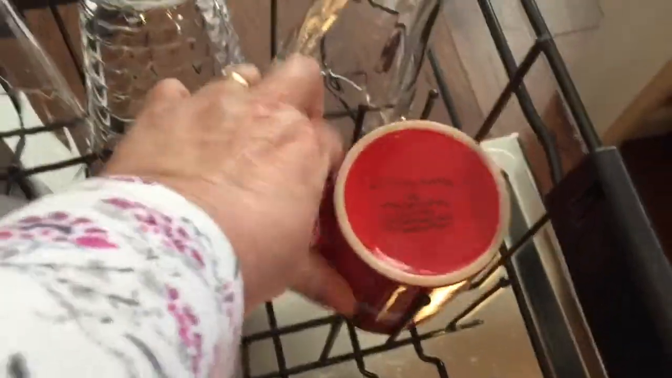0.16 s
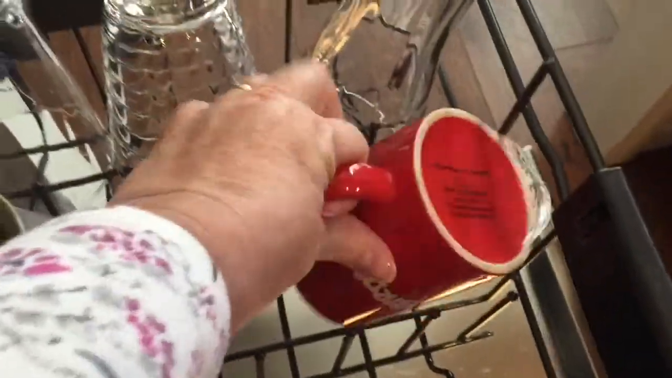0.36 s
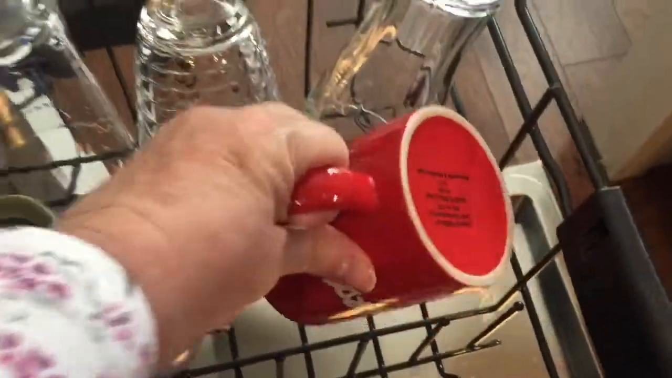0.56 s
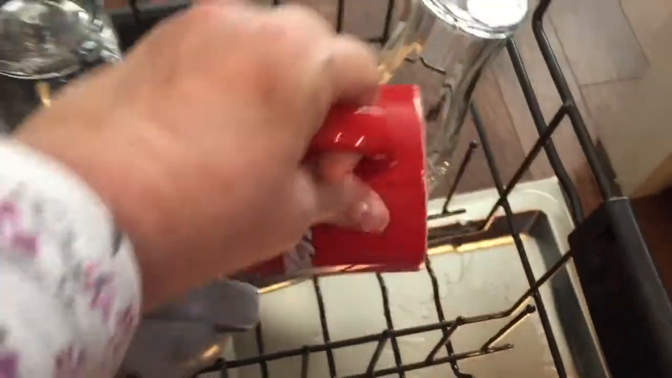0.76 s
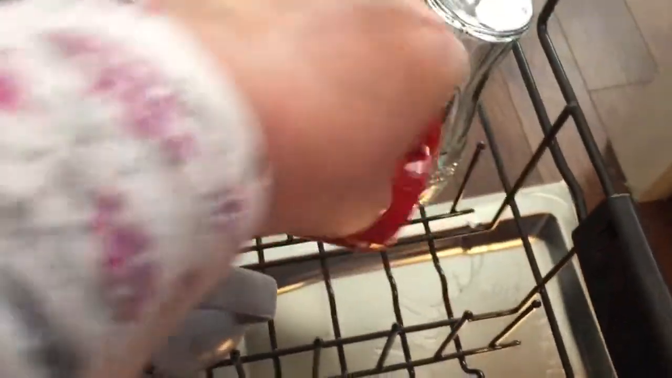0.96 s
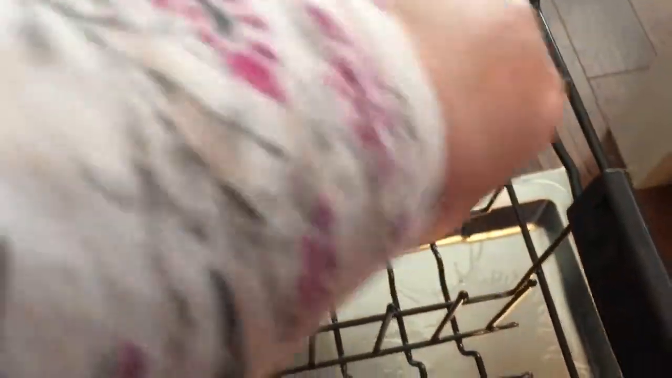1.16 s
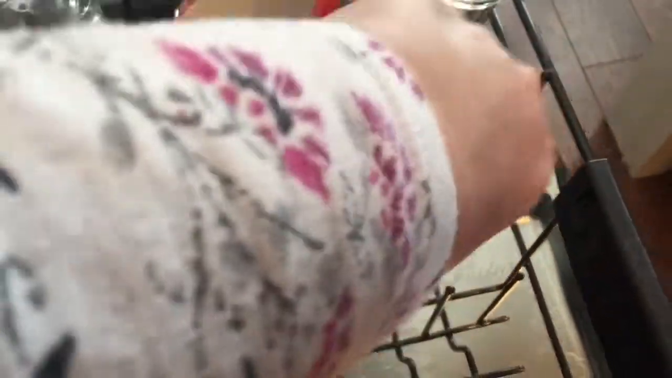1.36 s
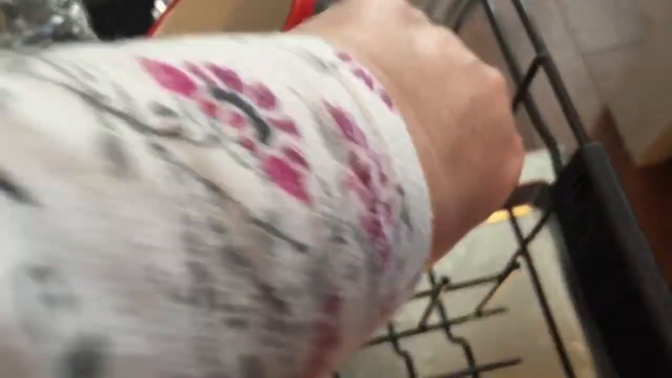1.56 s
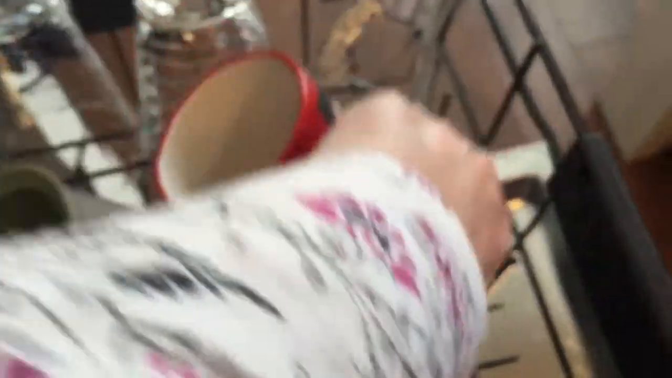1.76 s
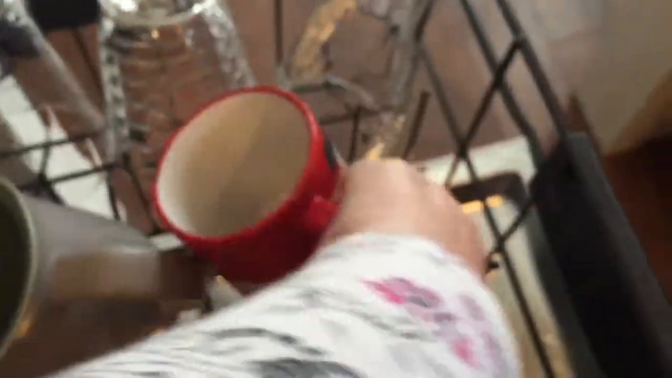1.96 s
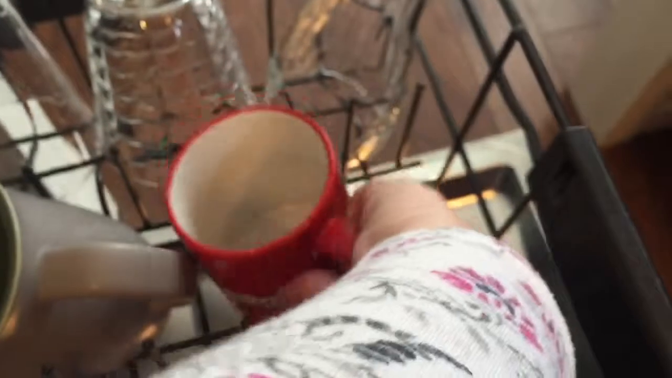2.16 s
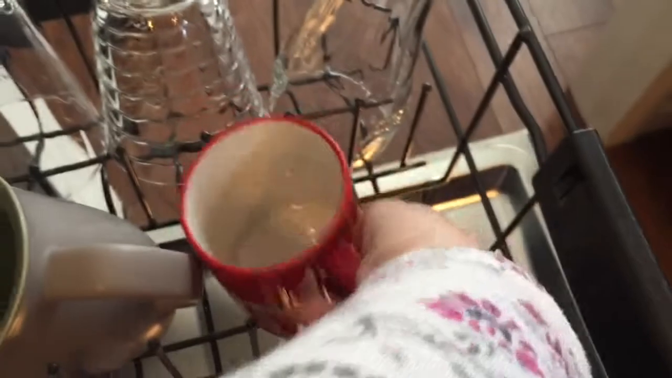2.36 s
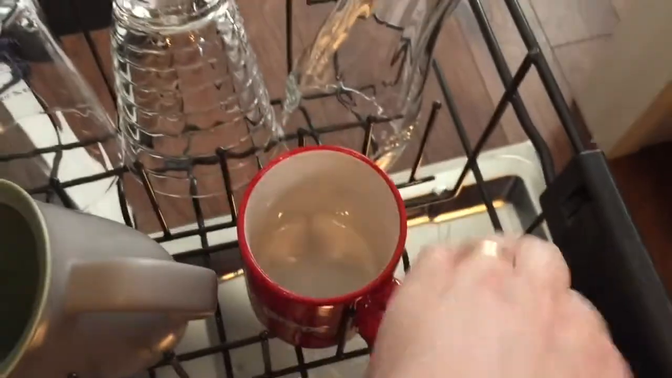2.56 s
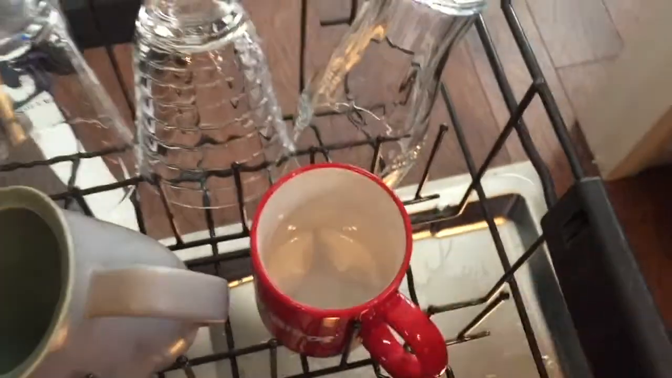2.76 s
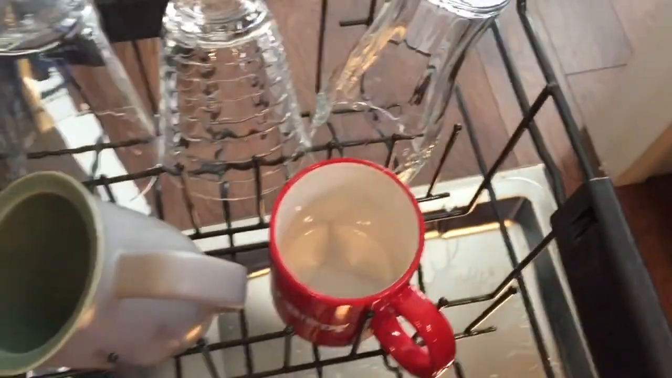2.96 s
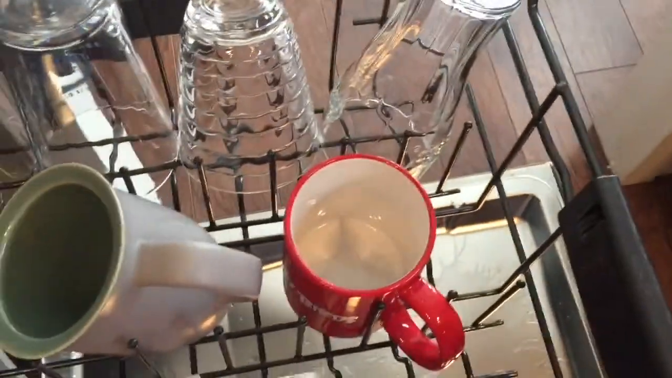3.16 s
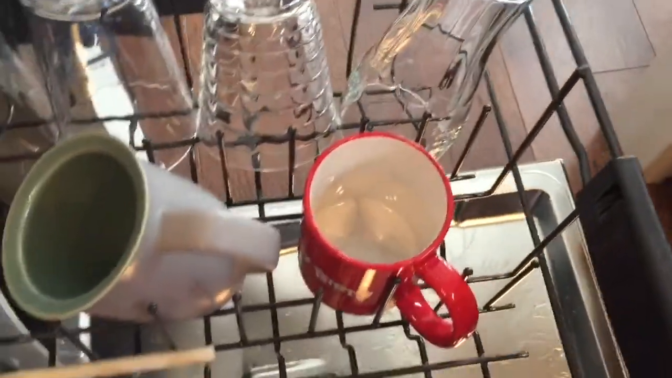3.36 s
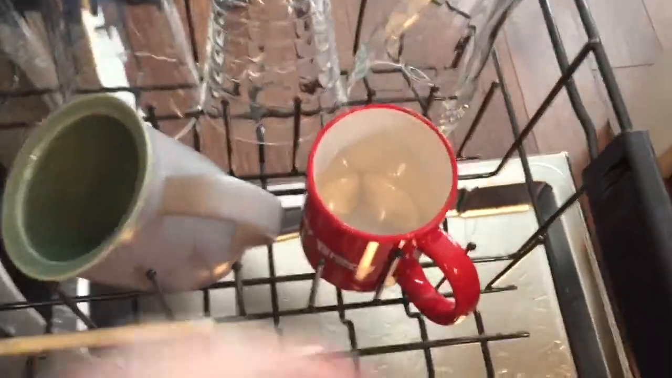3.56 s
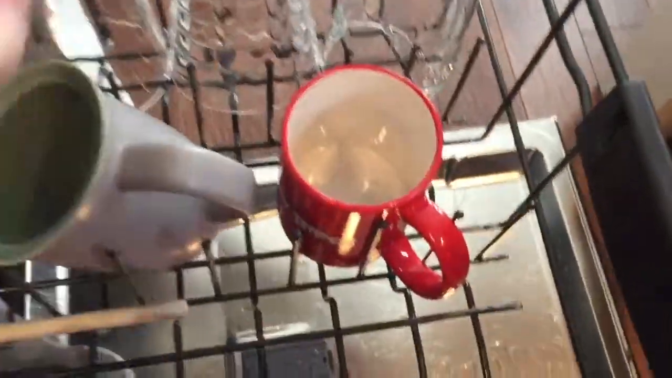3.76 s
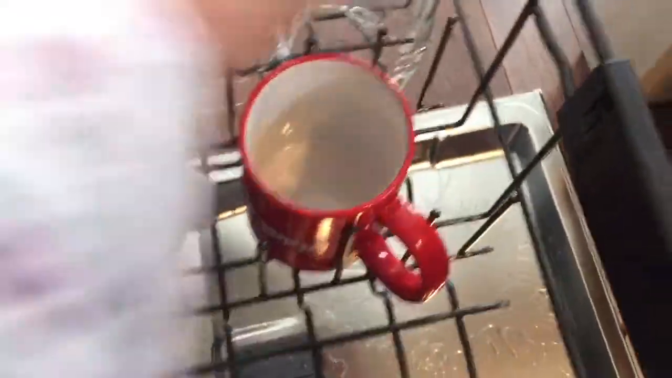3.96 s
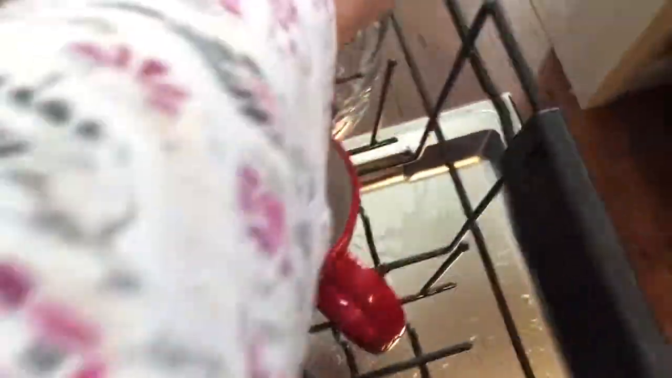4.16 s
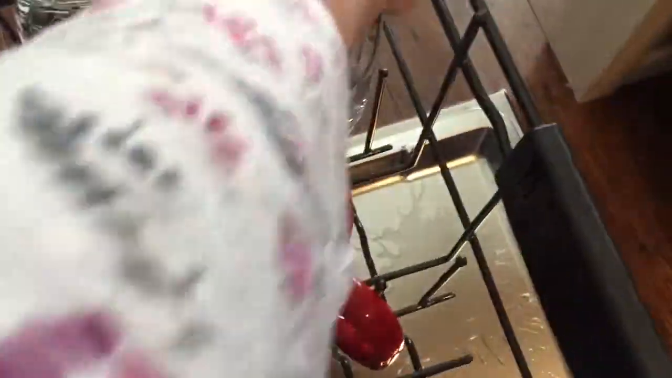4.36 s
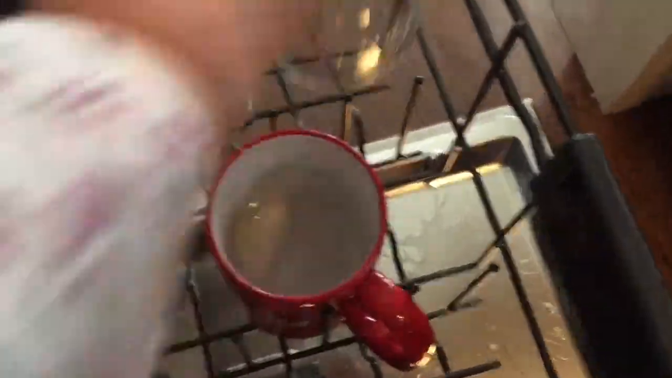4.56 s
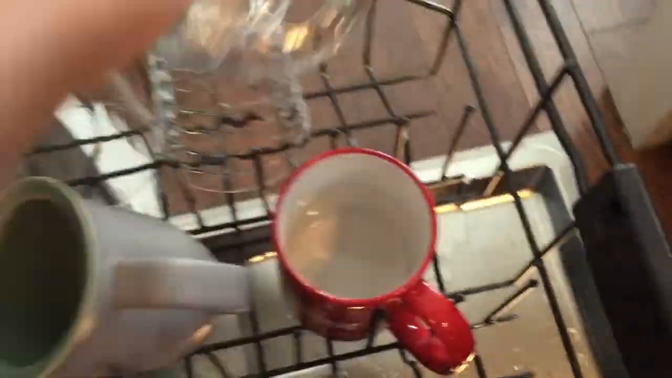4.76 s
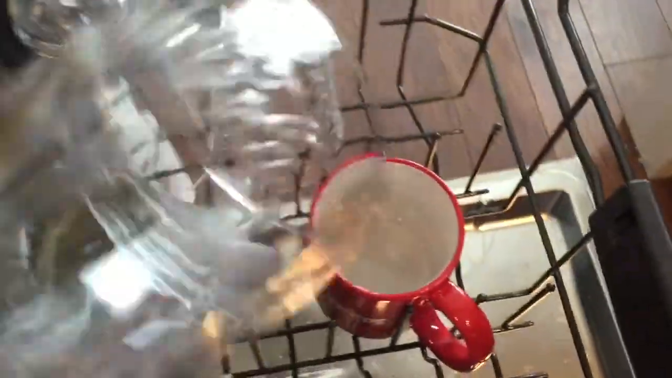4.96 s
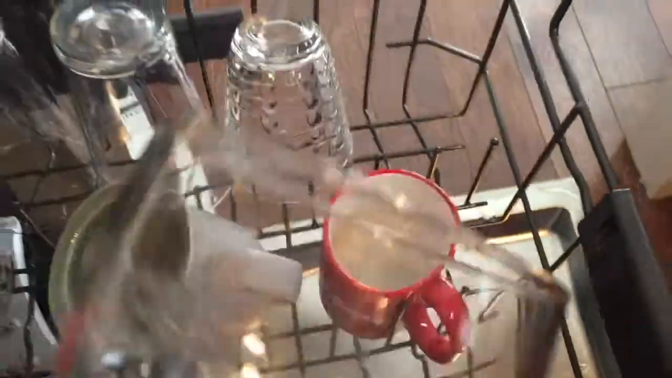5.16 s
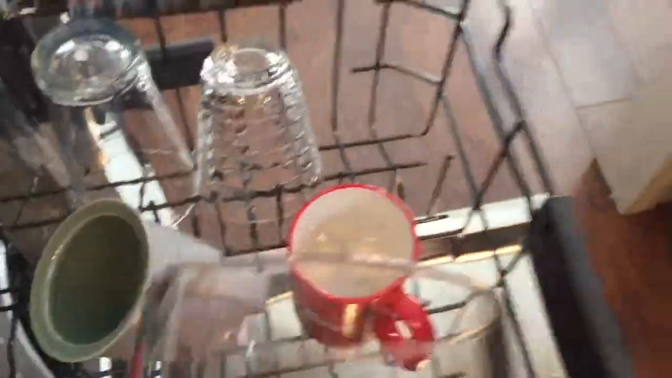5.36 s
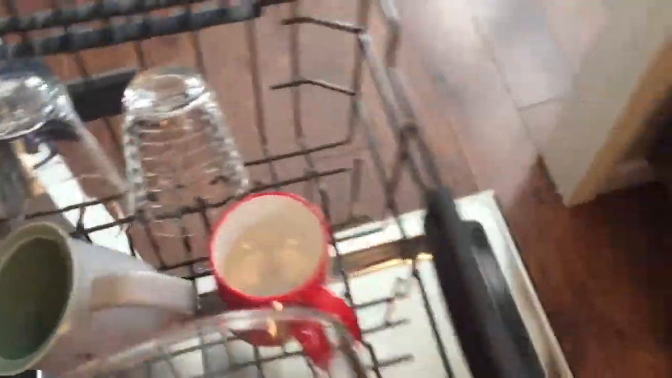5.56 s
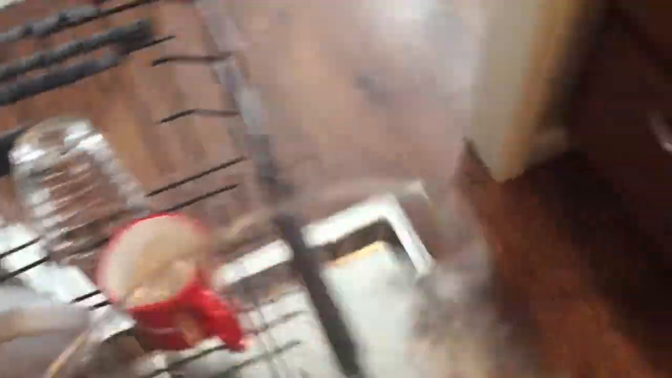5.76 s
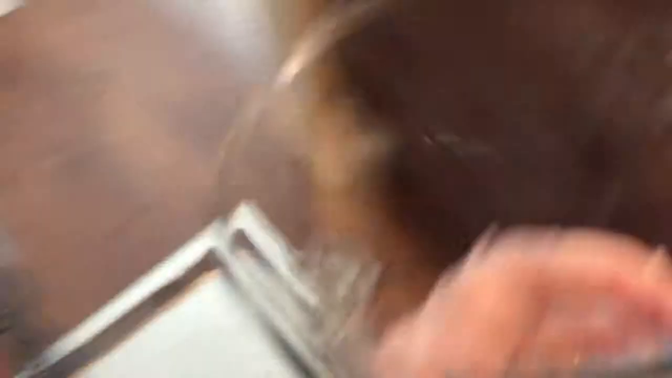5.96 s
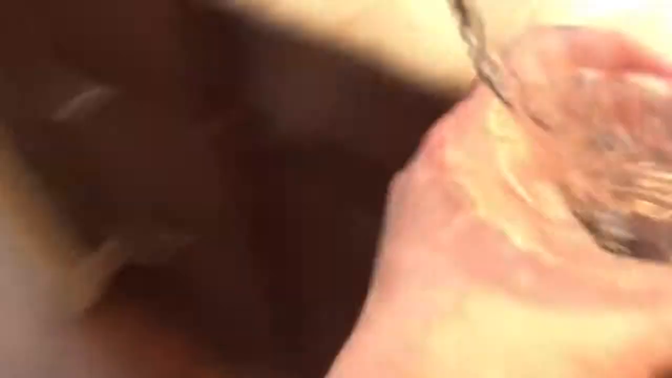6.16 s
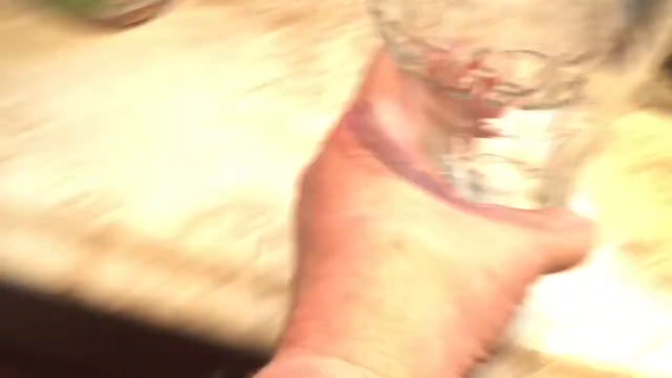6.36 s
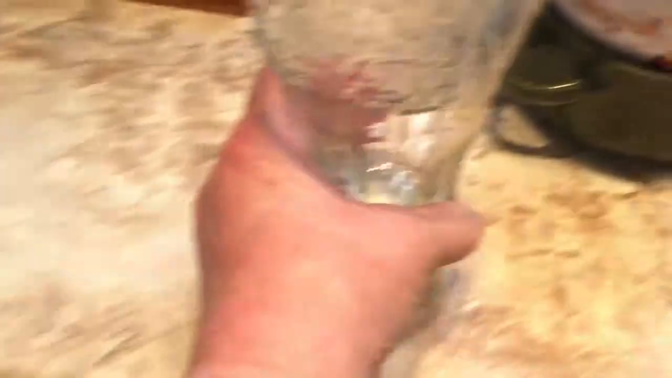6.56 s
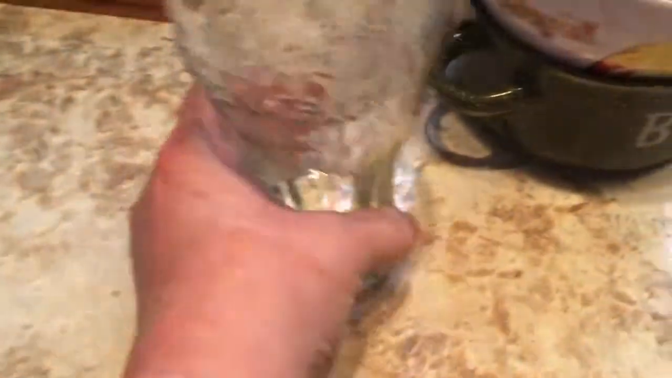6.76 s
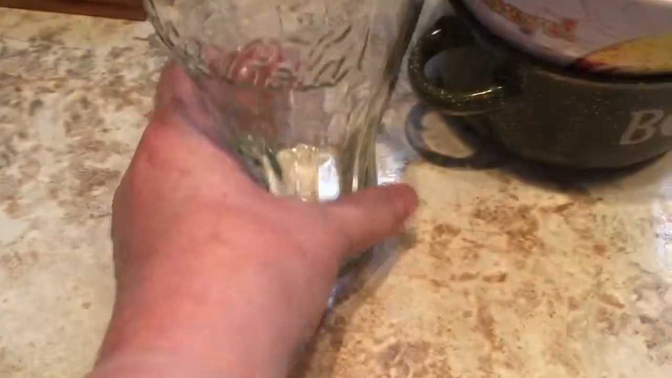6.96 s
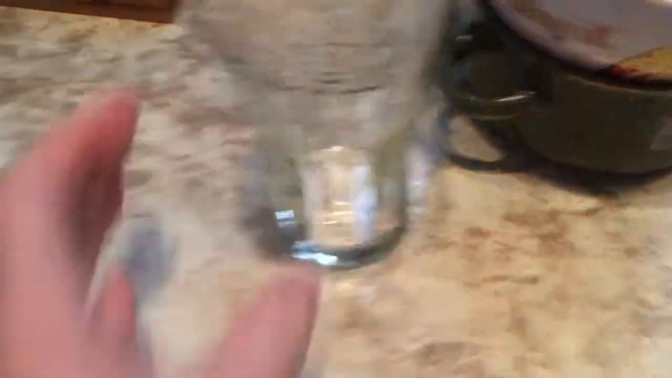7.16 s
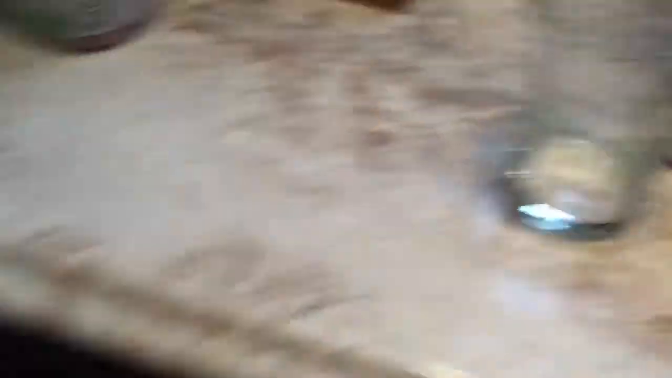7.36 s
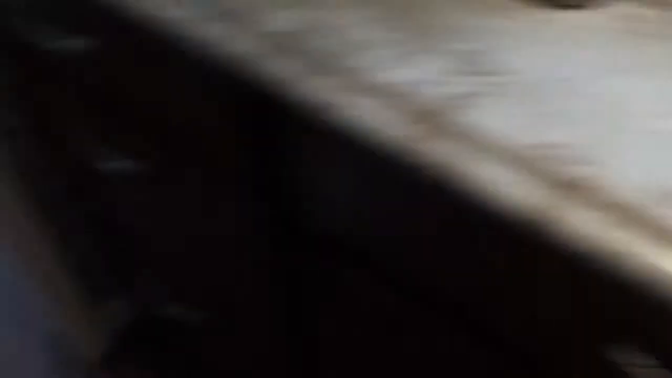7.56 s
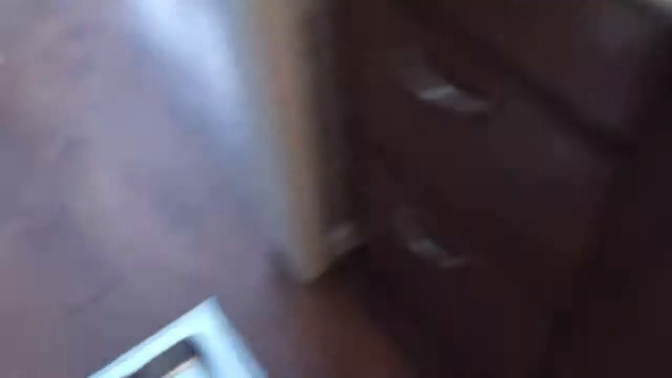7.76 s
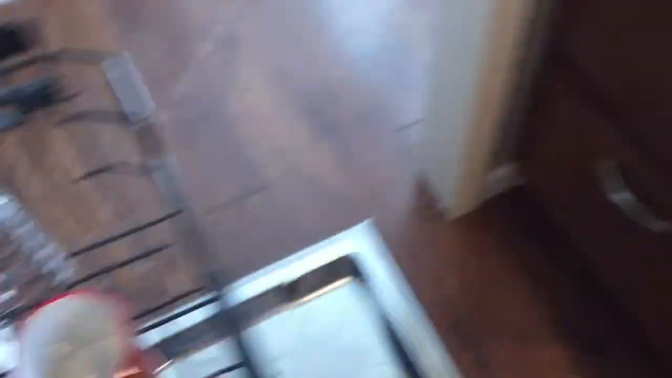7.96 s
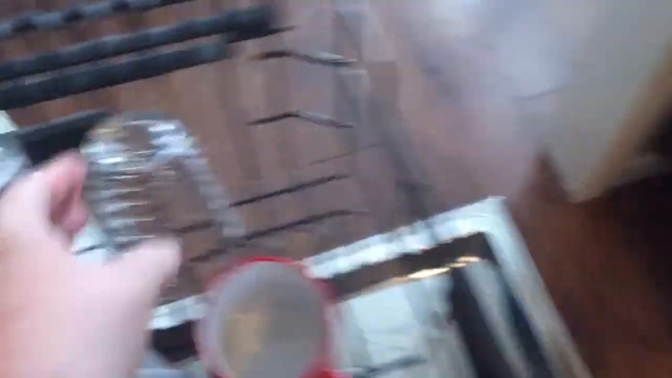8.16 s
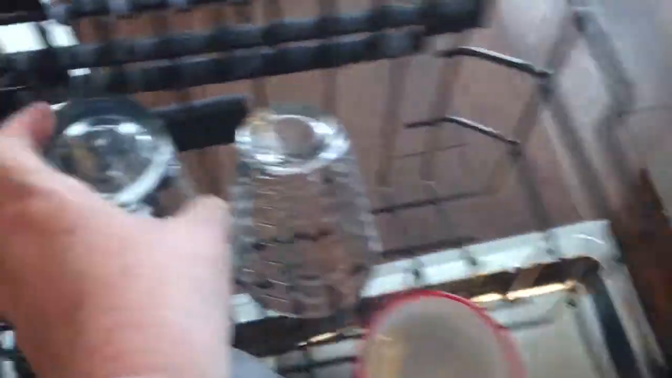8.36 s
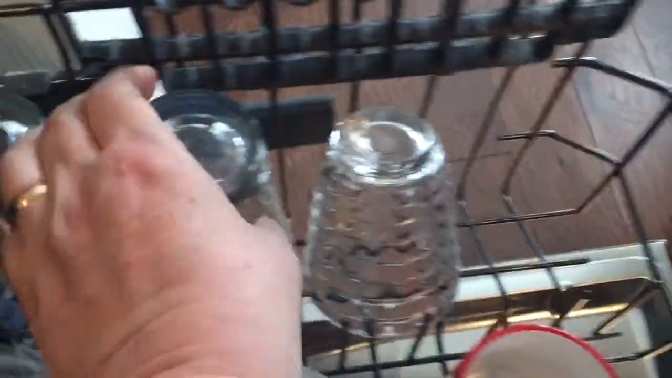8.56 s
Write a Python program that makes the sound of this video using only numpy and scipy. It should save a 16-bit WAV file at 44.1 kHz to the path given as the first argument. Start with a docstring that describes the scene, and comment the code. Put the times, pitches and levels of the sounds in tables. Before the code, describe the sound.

In a small kitchen, heard close up, a ceramic mug is turned over in a wire dishwasher rack. The wires rattle and the mug clinks sharply against its neighbours, then clatters again as it settles. After a pause a drinking glass grazes another and rings faintly as it is lifted out. Low handling thumps follow, and the glass lands on a stone counter with a firm knock. A faint appliance hum lies underneath.

```python
"""Mug and glass at an open dishwasher

A small hard kitchen, heard close up on a hand-held phone. A hand turns a mug over in the wire rack:
it clinks on its neighbours and the rack jolts and rattles. A tall glass is lifted out, sings until
fingers stop it, and is set on a stone counter. The room rings briefly over a low appliance hum."""
import sys
import numpy as np
from scipy import signal
from scipy.fft import rfft, irfft
from scipy.io import wavfile
from scipy.ndimage import uniform_filter1d

SR = 44100
rng = np.random.default_rng(int(sys.argv[2]) if len(sys.argv) > 2 else 0)


def put_to_file(sound):
    """Save the sound as 16-bit audio at rate SR, in the file named by the first command-line argument."""
    columns = np.atleast_2d(sound).T  # one column per channel
    safe = np.clip(columns, -1, 1)
    whole_steps = np.round(safe * 32767)
    wavfile.write(sys.argv[1], SR, whole_steps.astype(np.int16))


N = 383213

# modes of two mugs in the rack: f/Hz; and for each mode level/dB, t60/s
MUG_A_HZ, MUG_A_RING = [764, 2290, 2428, 4176, 6390, 6855, 7095, 8090, 8714, 9428, 10146, 11765, 12810,
                        13950, 14890, 15555], [(-6.5, 0.064), (0, 0.41), (-6, 0.36), (-10, .35), (-10, 0.37),
                                        (-7.5, 0.24), (-13.5, .2), (-25.5, .5), (-14, 0.19), (-12, 0.39),
                                        (-14.5, 0.17), (-23, 0.45), (-22.5, .25), (-30, .3), (-36, 0.22),
                                        (-39, .25)]
MUG_B_HZ, MUG_B_RING = [1270, 2223, 2482, 2972, 3338, 5001, 5346, 5981, 6212, 7257, 10920, 11460], [(-20, .12), (5.5, 0.055), (-1.5, 0.16), (-15.5, 0.075),
                                          (-21.5, 0.17), (-21, 0.84), (-22, 0.15), (-14.5, 0.29),
                                          (-21, 0.2), (-19.5, 0.42), (-29, .17), (-32, 0.18)]
# modes of the tumbler beside them and of a grazed glass: f/Hz, level/dB, t60/s
TUMBLER_MODES, GRAZED_MODES = [(662, -6, .12), (4400, -8, .09), (4662, 0, .09), (4861, -3, .09),
                               (5100, -9, .07), (6196, -16, .2), (7219, -22, .2), (8296, -15, .13),
                               (10480, -21, .13), (10970, -22, .11), (11370, -19, .2), (11960, -13, .16),
                               (12390, -22, .08), (13760, -24, .15), (14650, -24, .13)], [(4450, 0, .2), (5329, -9, .14), (5609, -10, .12),
                                                (6110, -6, .17), (7058, -5, .16), (7989, -16, .2),
                                                (8942, -14, .14), (9631, -20, .2), (9964, -16, .2),
                                                (10690, -15, .11), (13170, -18, .11)]
# clinks: t/s, mug A/dB, mug B/dB, tumbler/dB, contact/ms, free ring/s, t60 of the touch after it/s
CLINKS = [(.151, -43, -31.5, -46.5, 0.14, 0.032, 0.075), (.540, -40, -25.5, -49.5, 0.25, 0.023, .06),
          (.585, -46, -35.5, -52, 0.23, 0.055, 0.086), (0.8229, -8.5, -12, -13.5, 0.044, 0, 0.28),
          (.8545, -24, -30, -25, 0.053, 0, .25), (1.9056, -25.5, -23.5, -41, 0.077, 0.048, 0.064),
          (1.9194, -61, -17.5, -28, 0.18, 0.062, 0.08), (1.965, -39, -31, -29.5, 0.18, 0.037, .1),
          (1.999, -49.5, -30, -41, .2, 0, .1), (2.162, -49, -38.5, -44, 0.24, .03, .08),
          (2.193, -38.5, -32.5, -47.5, 0.24, 0.11, .06), (2.228, -43, -48.5, -49, 0.067, 0.11, .06),
          (2.446, -18.5, -17.5, -28.5, 0.12, 0.088, 0.056), (2.4645, -27, -24, -35, .1, 0.00067, 0.066),
          (2.511, -34.5, -24.5, -42, 0.059, 0.025, 0.065), (2.5673, -28.5, -27.5, -24, 0.12, 0.0094, .06)]
# the lifted glass grazes another: t/s, level/dB
GRAZES = [(4.397, -39), (4.445, -29.5)]
# the low body knock of the mug's loudest clink (0.82 s) and light ticks: t/s, level/dB, f/Hz, t60/s
KNOCK_AND_TICKS = [(.33, -56, 7048, 0.19), (.43, -29, 7166, 0.057), (.8225, -9, 795.2, .09),
                   (3.779, -61, 7260, .02), (4.29, -40.5, 1482, 0.1), (6.28, -66, 3400, 0.016),
                   (6.33, -64.5, 4070, 0.018), (6.372, -55, 4140, .015), (6.414, -55.5, 3913, 0.019),
                   (6.464, -62, 3960, 0.0205), (6.575, -56.5, 3860, .02), (6.674, -54, 6410, 0.072),
                   (7.272, -68, 3955, 0.012)]

def crockery():
    """Close to the microphone, each clink rings both mugs and the tumbler; resting loosely, they waver."""
    vessels = np.c_[MUG_A_HZ, MUG_A_RING], np.c_[MUG_B_HZ, MUG_B_RING], TUMBLER_MODES
    out = np.zeros(N)
    for s, *levels_db, contact_ms, free_s, held_t60 in CLINKS:
        for modes, db in zip(vessels, levels_db):
            add(out, s, undb(db) * ring(modes, contact_ms, free_s, held_t60, wobble_db=4.5))
    for s, db in GRAZES:
        add(out, s, undb(db) * ring(GRAZED_MODES, wobble_db=4.5))
    for s, db, hz, t60 in KNOCK_AND_TICKS:
        add(out, s, ring([(hz, db, t60)], contact_ms=.06))
    return out


# low modes of the slide rails and the rack frame: f/Hz, level/dB, t60/s
RAIL_MODES, FRAME_MODES = [(95.8, 7, 0.17), (110, -12, 0.24)], [(203, -6.5, .08), (254, 5, 0.07), (282, 4.5, 0.08)]
# bands in which the wires ring: low/Hz, high/Hz; and for each band t60/s
WIRE_BANDS, WIRE_T60 = [(350, 820), (820, 1900), (2100, 3900), (4300, 9500), (9500, 16000)], [0.1, 0.042, 0.052, 0.031, 0.005]
# jolts: t/s, rails/dB, frame/dB, wires/dB, loudest wires/octaves above 500 Hz,
# steepness of the fall away from them, rattle decay/s
JOLTS = [(0.093, -62, -48.5, -28.5, 1.48, 5, 0.033), (.149, -61, -45, -24.5, 2.47, 9, 0.027),
         (.175, -43.5, -36.5, -28, 0.62, 5, 0.017), (0.214, -45, -34, -33.5, .1, 3, 0.077),
         (0.29, -47, -34, -26, 0.77, 6, 0.037), (.357, -47, -42, -28.5, 1.44, 6, 0.013),
         (.382, -38, -20, -12.5, 2, 1.5, 0.023), (0.393, -37, -23, -17, 1.4, 2.5, 0.01),
         (.411, -37, -28.5, -16.5, 1.1, 3, 0.0064), (0.43, -33.5, -29, -20, 1.7, 4, 0.0056),
         (.536, -54, -46, -23, 2.52, 11, .025), (0.578, -50.5, -47, -26, 2.01, 9, 0.047),
         (0.74, -42.5, -44.5, -45, 1.8, 2.2, 0.011), (.7565, -41.5, -47.5, -32.5, 4, 4, .004),
         (0.8214, -40, -36, -13, 2.9, 1.6, .004), (1.077, -42.5, -37.5, -34.5, 0.29, 5, 0.017),
         (1.907, -53, -30, -18.5, 1.7, 6.5, .012), (1.964, -41.5, -47.5, -26.5, 2.84, 9, 0.018),
         (1.996, -62.5, -42, -25.5, 2.15, 6, 0.025), (2.1, -60, -46, -47.5, 1.7, 3.5, .0093),
         (2.16, -43, -52, -42, 2.2, 11, 0.02), (2.195, -45.5, -43.5, -31.5, 0.93, 3.5, 0.11),
         (2.278, -40, -16.5, -14, 2.04, 4, 0.023), (2.295, -30.5, -21.5, -16.5, 2.13, 3.5, 0.013),
         (2.511, -41, -27, -21, 1.4, 2.5, 0.048), (2.565, -57, -21.5, -15, 3.02, 4.5, 0.012),
         (2.583, -53, -23.5, -15.5, 0.9, 2.5, 0.018), (2.609, -31.5, -48, -21.5, 0.64, 4.5, .0068),
         (3.64, -61, -44, -48, 1.6, 3, 0.0083), (3.66, -77, -52, -56.5, .6, 2, .015),
         (4.197, -45.5, -51, -58.5, 2.05, 1.5, 0.014), (4.225, -35.5, -41, -45.5, 3.55, 7.5, 0.013),
         (4.29, -52, -53, -46.5, 1.35, 6, .004), (4.398, -44.5, -38, -23, 1.36, 2.2, 0.028),
         (4.443, -43.5, -41, -25, 1.9, 5, 0.05), (4.499, -52, -34, -31.5, 0.49, 5, 0.041),
         (8.6, -55, -53, -57, 1.33, 3, 0.013), (8.631, -52, -43, -51, .1, 5.5, .015)]

def rack():
    """Under the mugs, each jolt is a short swarm of contacts that rings rails, frame and wires."""
    t = np.arange(int(.15 * SR)) / SR
    out = np.zeros(N)
    for s, rails_db, frame_db, wires_db, loudest_oct, steepness, decay_s in JOLTS:
        contacts = rng.standard_normal(len(t)) * undb(3 * rng.exponential(size=len(t)))
        contacts *= rng.random(len(t)) < .25
        swarm = contacts * np.exp(-t / np.clip(decay_s, .002, .06)) * (1 - np.exp(-t / .001))
        body = (undb(rails_db) * ring(RAIL_MODES) + undb(frame_db) * ring(FRAME_MODES))[:len(t)]
        for edges_hz, t60 in zip(WIRE_BANDS, WIRE_T60):
            octaves = np.mean(np.log2(np.array(edges_hz) / 500)) - loudest_oct
            fall_db = steepness * (1.2 if octaves > 0 else .7) * abs(octaves) ** 1.4  # gentler below
            body += noise(*edges_hz, len(t)) * undb(wires_db - fall_db - 60 * t / t60)
        add(out, s, signal.fftconvolve(swarm, body) / np.sqrt(np.sum(swarm ** 2)))
    return out


def door_panel():
    """The open door drones after each jolt of the frame, less than in proportion to the blow."""
    power = undb(-72) ** 2 + dying(0, db=-48, t60=2.8) ** 2  # steady floor and an earlier blow
    for s, _, frame_db, *_ in JOLTS:
        power += dying(s, db=.55 * frame_db - 41.5, t60=2.8) ** 2
    return np.sqrt(power) * undb(2 * wander(2.7)) * noise(185, 310)


# modes of the tall glass: f/Hz; and for each mode level/dB, t60/s
GLASS_HZ, GLASS_RING = [1384, 3050, 4600, 6150, 8091, 9600, 13210, 14320], [(-3.5, 1), (-10, 0.0292), (-4, 0.071), (-11.5, 0.043), (-8, 0.072),
                                         (-20.5, .05), (-8.5, .07), (-10, .06)]
# the glass is rubbed or slides: t/s, length/s, level/dB, slip rate/Hz, contact/ms
SLIDES = [(5.066, 0.048, -62.5, 40, 0.1), (5.126, 0.14, -71.5, 40, .094), (6.953, 0.21, -67, 370, 0.023)]
# the glass slides in the hand, catching in a run of short ticks: t/s, level/dB
SLIP_TICKS = [(6.0012, -59), (6.0237, -51), (6.0364, -50), (6.0461, -48), (6.077, -51), (6.0965, -48.5),
              (6.1138, -48.5)]
# a faint low ring lingers in the room after the glass lands, then two short scrapes: t/s, level/dB, t60/s
TAIL_AND_SCRAPES = [(6.85, -63, 0.93), (6.987, -50, .12), (7.04, -46, 0.22)]
# modes of the stone counter: f/Hz, level/dB, t60/s
COUNTER_MODES = [(116, -21.5, .05), (198, -15, 0.044), (326, -8.5, 0.047), (480, -10, 0.02),
                 (641, 5, 0.037), (730, 3.5, 0.048), (950, -0.5, 0.024), (1165, -3, 0.044),
                 (1305, 0, 0.016), (1603, -12, .025), (1890, -28, 0.022)]
# the base lands on the counter: t/s, counter/dB, crack/dB, glass/dB
LANDINGS = [(6.802, -50, -66, -75.5), (6.824, -7.5, -25, -37), (6.846, -27.5, -60, -55),
            (6.987, -36, -72, -75.5), (7.045, -50, -67, -60)]

def tall_glass():
    """From hand to counter: the glass chirps as it is rubbed and slides, then knocks on the stone."""
    glass = np.c_[GLASS_HZ, GLASS_RING]
    out = np.zeros(N)
    for s, length_s, db, slip_hz, contact_ms in SLIDES:
        slips = (rng.random(N) < slip_hz / SR) * rng.uniform(.44, 1.4, N) * np.sqrt(400 / slip_hz)
        out += signal.fftconvolve(stroke(s, length_s, db) * slips, ring(glass[2:], contact_ms))[:N]
    for s, db in SLIP_TICKS:
        add(out, s, undb(db) * ring(glass[1:6], contact_ms=.1, free_s=0, held_t60=.076))
    out += sum(dying(*row) for row in TAIL_AND_SCRAPES) * undb(2.1 * wander(240)) * noise(422, 1400)
    t = np.arange(int(.06 * SR)) / SR
    for s, counter_db, crack_db, glass_db in LANDINGS:
        add(out, s, undb(counter_db) * ring(COUNTER_MODES, contact_ms=.18, polarity=.96))
        knock = noise(520, 1430, len(t)) * undb(counter_db + 6 - 60 * t / .036)
        crack = noise(1800, 7600, len(t)) * undb(crack_db - 60 * t / .0093)
        add(out, s, knock + crack)
        add(out, s, undb(glass_db) * ring(glass, contact_ms=.027, free_s=.36, held_t60=.12))
    return out


# two rim modes of the lifted glass: f/Hz, struck t/s, level/dB, change with distance/dB
RIM_MODES = [(1384, 4.43, -35.5, -23.5), (2437, 4.5, -39.5, -36.5)]
# for each mode, when a silent side faces the microphone: t/s; and when fingers stop it: t/s
NULLS_S, STOPS_S = [
    [4.522, 4.68, 4.915],
    [4.532, 4.6, 4.8, 4.94],
], [5.41, 5.22]

def singing_rim():
    """Rim modes swell and dip as the glass turns, and fade as it is carried away from the microphone."""
    t, out = np.arange(N) / SR, np.zeros(N)
    for (hz, s, db, far_db), nulls_s, stop_s in zip(RIM_MODES, NULLS_S, STOPS_S):
        lobes_passed = np.interp(t, [s, *nulls_s, stop_s], [*range(len(nulls_s) + 1), len(nulls_s) + .85])
        swell = np.abs(np.sin(np.pi * lobes_passed)) ** 1.17 * (t > s) * (t < stop_s)
        away_db = far_db * (1 - np.exp(-np.abs(t - s) / .34))
        out += undb(db + away_db) * swell * np.sin(2 * np.pi * hz * t)
    return out


# skin and sleeve brush past: t/s, length/s, level/dB, treble share/0-1
BRUSHES = [(0.795, 0.029, -36.5, 0.5), (3.628, 0.031, -53.5, 0.13), (5.365, .06, -65, 0.8),
           (5.549, .14, -52, .36), (5.827, 0.062, -66.5, 0.5), (6.665, .08, -67, 0.27),
           (7.5, .1, -71, 0.46)]

def brushes():
    """The soft hiss of skin and cloth near the microphone."""
    mid, treble = noise(2800, 7800), noise(9000, 15500)
    out = stroke(3.04, length_s=.26, db=-70) * noise(3900, 4700)  # a faint narrow hiss swells once
    for s, length_s, db, share in BRUSHES:
        out += stroke(s, length_s, db) * undb(1.5 * wander(75)) * ((1 - share) * mid + share * treble)
    return out


# the grip on the phone shifts: t/s, level/dB, f/Hz, t60/s
GRIP_THUMPS = [(6.119, -40, 67.3, 0.08), (6.16, -23, 75.4, 0.071), (6.209, -23.5, 59.2, 0.078),
               (6.499, -47, 40.4, 0.078), (6.698, -48.5, 72.7, 0.08), (7.549, -44, 72.7, 0.087)]

def grip():
    """Handling noise: low thumps reach the microphone through the case."""
    out = np.zeros(N)
    for s, db, hz, t60 in GRIP_THUMPS:
        add(out, s, band(ring([(hz, db, t60)]), 20, 280))
    return out


# spectrum of the kitchen's hiss: f/Hz, relative level/dB
HISS_SPECTRUM = [(15, -56), (25, -22.5), (41, -3.5), (65, 0.5), (92, -19.5), (208, -13.5), (259, -21.5),
                 (296, -15), (399, -19), (854, -20.5), (1360, -24.5), (1730, -26), (11600, -40),
                 (15200, -41.5), (16500, -56.5)]
# bands of appliance hum: f/Hz, width/Hz, level/dB
HUM_BANDS = [(57, 6, -65), (221, 60, -72), (282.7, 24, -74), (832, 7.2, -81.5)]
# a deep rumble comes and goes: t/s, level/dB
RUMBLE_LEVELS = [(0, -50), (.4, -55), (1.0, -57), (1.6, -75), (2.1, -55), (2.55, -46), (2.85, -66),
                 (3.7, -62.5), (4.0, -72), (4.4, -53.5), (4.65, -68), (6.0, -68.5), (6.3, -56), (6.6, -62),
                 (6.94, -47.5), (7.25, -61), (8.15, -66.5), (8.69, -76)]

def room_tone():
    """Behind everything: coloured hiss, a wavering appliance hum and a rumble that swells."""
    hz, db = np.transpose(HISS_SPECTRUM)
    bins_hz = np.maximum(np.fft.rfftfreq(N, 1 / SR), 1)
    colour = undb(np.interp(np.log(bins_hz), np.log(hz), db))
    hiss = irfft(rfft(rng.standard_normal(N)) * colour, N)
    hum = sum(noise(centre - width / 2, centre + width / 2) * undb(level_db + 2 * wander(3.2))
              for centre, width, level_db in HUM_BANDS)
    rumble_db = np.interp(np.arange(N) / SR, *np.transpose(RUMBLE_LEVELS))
    rumble = noise(45, 100) * undb(rumble_db + 2 * wander(2.9))
    return unit(band(hiss, 81, 18000)) * undb(-65.5) + hum + rumble


# reverberation of the kitchen: f/Hz, t60/s
KITCHEN_T60 = [(150, 0.7), (500, .5), (1500, 0.55), (4000, 0.38), (9000, 0.35), (16000, 0.18)]

def kitchen_echoes(x):
    """Hard walls close by return dense echoes that die faster in the treble."""
    t = np.arange(int(.9 * SR)) / SR
    hz, t60 = np.transpose(KITCHEN_T60)
    tail = np.zeros(len(t))
    for centre in 60 * 2 ** np.arange(0, 8.2, .5):  # half-octave bands
        band_t60 = np.interp(np.log(centre), np.log(hz), t60)
        tail += band(rng.standard_normal(len(t)), centre / 1.19, centre * 1.19) * undb(-60 * t / band_t60)
    tail *= 1 - np.exp(-t / .0015)
    return undb(-13) * signal.fftconvolve(x, tail / np.sqrt(np.sum(tail ** 2)))[:N]


def ring(modes, contact_ms=.03, free_s=9., held_t60=.06, polarity=-1., wobble_db=0.):
    """One blow on modes (f/Hz, level/dB, t60/s); long contact dulls it, after free_s a touch damps it."""
    hz, db, t60 = np.array(modes, float).T[:, :, None]
    t = np.arange(int(.6 * SR)) / SR
    db = db + 1.5 * rng.standard_normal(db.shape)  # where the blow lands shifts the balance
    knots_s = np.arange(68) / 110  # levels waver 110 times a second
    wobble = np.array([np.interp(t, knots_s, row) for row in rng.standard_normal((len(hz), len(knots_s)))])
    fade_db = -60 * t / np.clip(t60, .005, 1) - 60 * np.maximum(t - free_s, 0) / held_t60
    facing = polarity ** np.arange(len(hz))[:, None]  # a wall's modes push in turn, a slab's together
    partials = undb(db + wobble_db * wobble + fade_db) * facing * np.sin(2 * np.pi * hz * t)
    pole = np.exp(-4000 / (SR * contact_ms))
    push = (1 - pole) * pole ** np.arange(200)
    return signal.fftconvolve(partials.sum(axis=0), np.convolve(push, push))


def stroke(s, length_s, db):
    """Envelope that rises for 42% of its length and falls for the rest."""
    progress = (np.arange(N) / SR - s) / length_s
    return undb(db) * np.clip(np.minimum(progress / .42, (1 - progress) / .58), 0, 1) ** 1.4


def dying(s, db, t60):
    """Envelope that starts at once and dies away."""
    t = np.arange(N) / SR - s
    return undb(db - 60 * np.abs(t) / t60) * (t >= 0)


def wander(rate_hz):
    """Smooth random drift of spread 1."""
    hold = int(SR / rate_hz)
    steps = np.repeat(rng.standard_normal(N // hold + 1), hold)
    return unit(uniform_filter1d(uniform_filter1d(steps, hold), hold)[:N])


def noise(lo_hz, hi_hz, n=N):
    return unit(band(rng.standard_normal(n), lo_hz, hi_hz))


def band(x, lo_hz, hi_hz):
    return signal.sosfilt(signal.butter(3, [lo_hz, hi_hz], "bandpass", fs=SR, output="sos"), x)


def undb(db):
    return 10 ** (np.asarray(db) / 20)


def unit(x):
    return x / np.sqrt(np.mean(x ** 2))


def add(out, s, x):
    i = int(s * SR)
    out[i:i + len(x)] += x[:len(out) - i]


def scene():
    """Mono, beside the dishwasher: close sounds and their echoes, plus dry rim, grip and room tone."""
    close = crockery() + rack() + door_panel() + tall_glass() + brushes()
    return (close + kitchen_echoes(close) + singing_rim() + grip() + room_tone())[None]


def record(dry):
    """The phone's microphone drops the deepest bass, rounds the loudest peaks and cuts the top."""
    low_cut = signal.sosfilt(signal.butter(3, 55, "highpass", fs=SR, output="sos"), dry)
    rounded = .95 * low_cut / (1 + low_cut ** 4) ** .25
    return signal.sosfilt(signal.ellip(10, .2, 90, 16000, fs=SR, output="sos"), rounded)


dry = scene()
out = record(dry)
put_to_file(out)
```